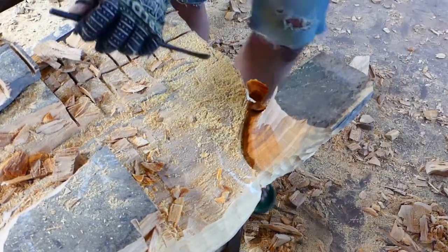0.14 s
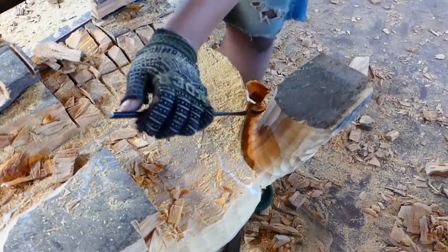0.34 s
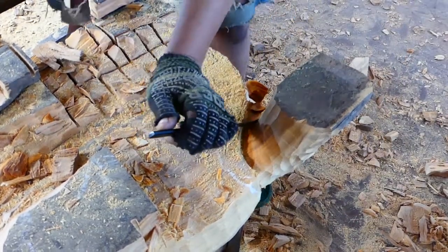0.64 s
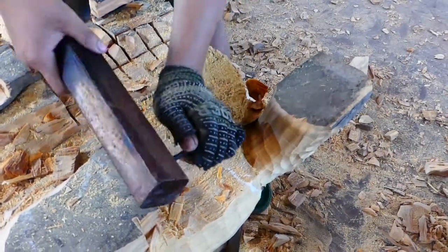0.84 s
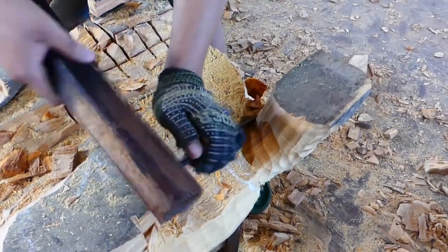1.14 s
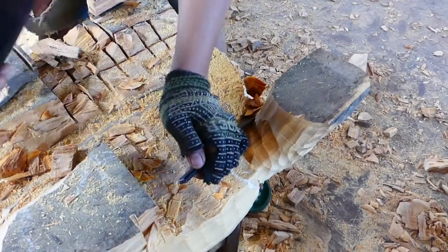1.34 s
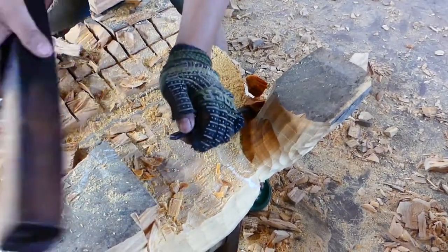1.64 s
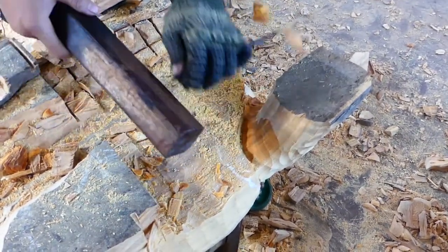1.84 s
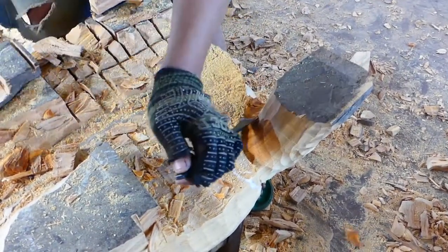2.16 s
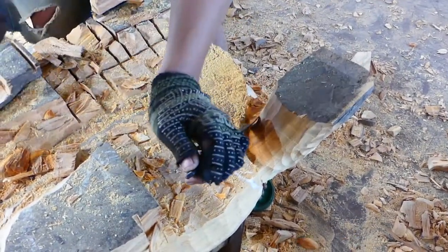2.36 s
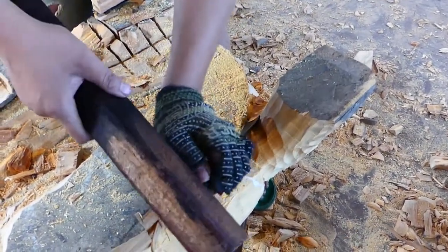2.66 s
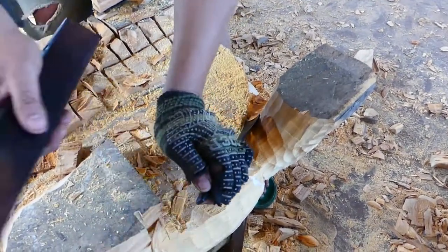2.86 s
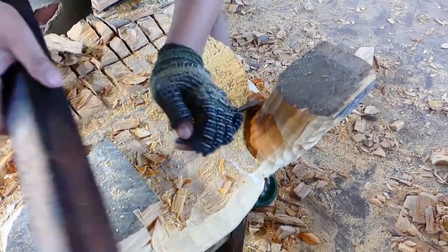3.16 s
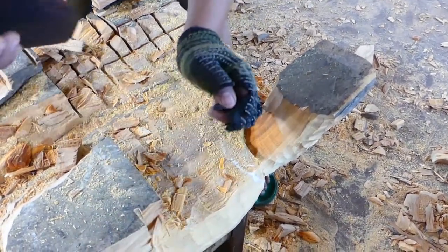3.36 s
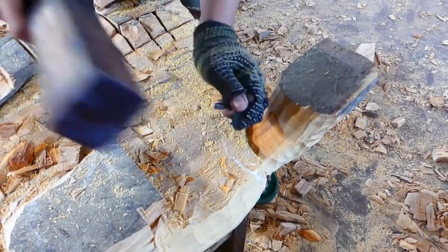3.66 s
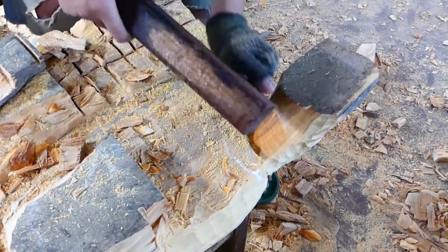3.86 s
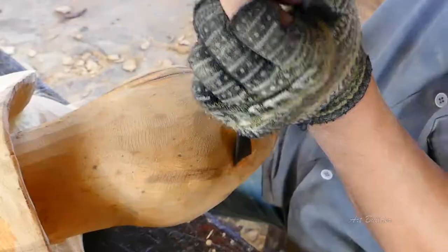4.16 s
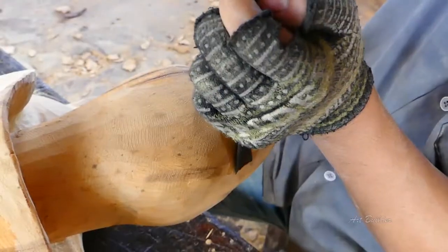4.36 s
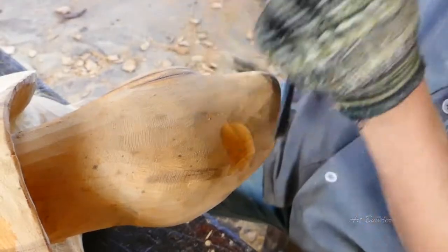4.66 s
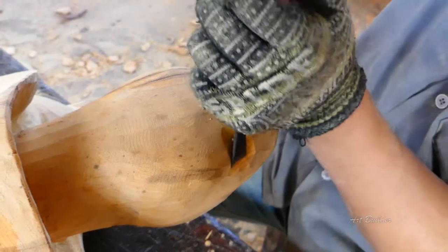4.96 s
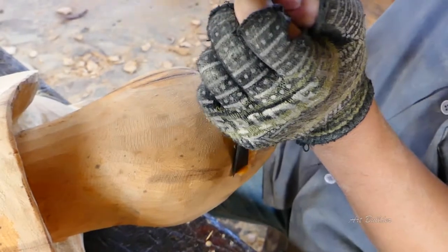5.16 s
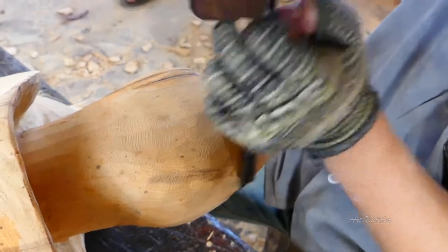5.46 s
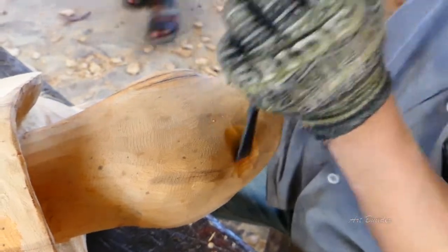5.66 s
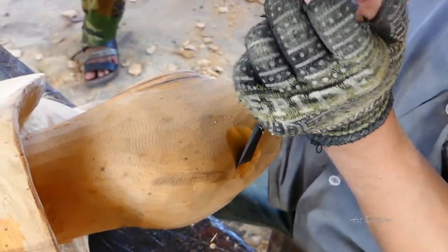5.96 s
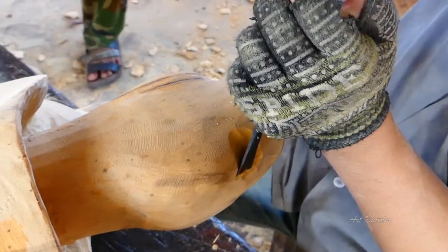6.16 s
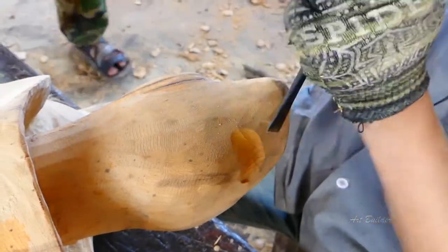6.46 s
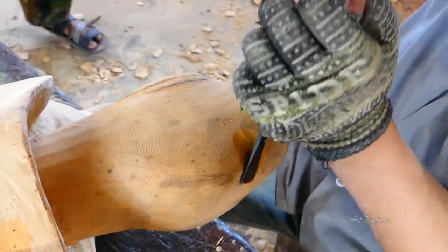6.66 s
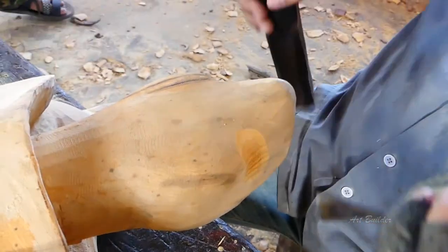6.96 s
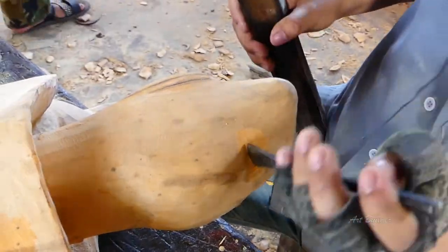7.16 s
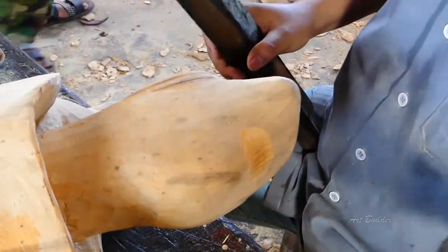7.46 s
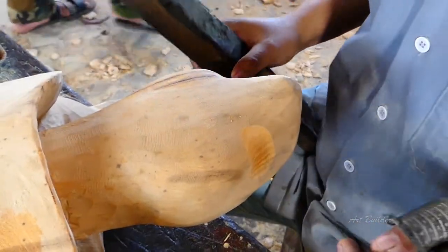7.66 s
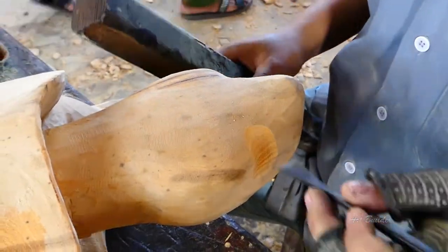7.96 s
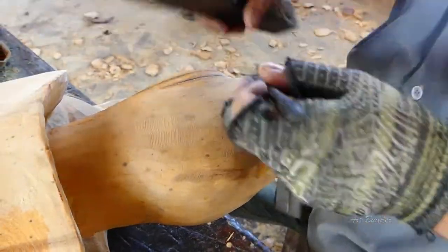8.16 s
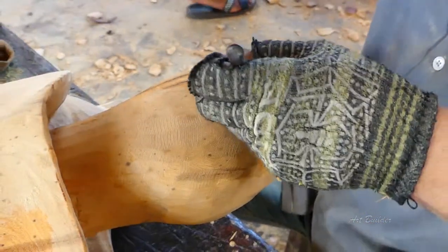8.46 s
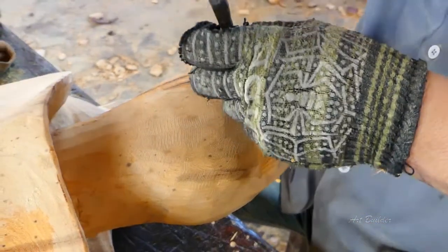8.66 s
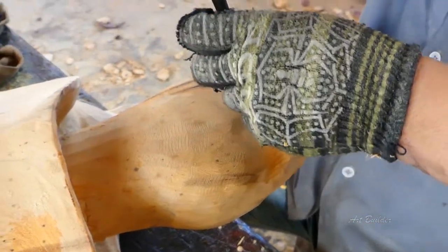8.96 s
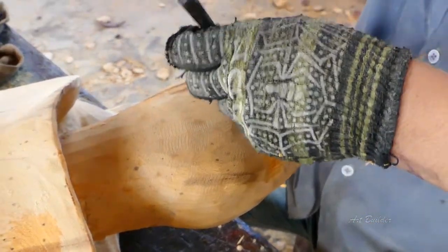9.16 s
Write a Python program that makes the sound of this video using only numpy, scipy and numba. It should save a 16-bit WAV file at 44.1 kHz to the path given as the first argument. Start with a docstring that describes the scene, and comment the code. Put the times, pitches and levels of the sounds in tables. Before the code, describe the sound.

Irregular chisel strikes crack loudly near the microphone in a reverberant, hard-walled workshop. A steady airy grinder hiss with a briefly straining whine fills the first part, with faint distant knocks. A short dead gap ends it abruptly. Then hollow, snapping mallet blows resume over quiet rumble and more distant hammering; the close work stops, small steel tools jingle, and two final hits land before a dull low rush.

```python
"""Wood carving at two benches

A wooden mallet drives a steel chisel close by in a hard-walled workshop; a short silence parts the benches.
Struck parts are decaying sines or resonances fed into lumpy noise tails: the close blows, the knocks of
other carvers and clinking tools. Shaped noise makes the low swells, the distant rumble and, at the first
bench, the grinder's hiss, with sine tones for its whine. A gain control ducks at every close blow."""
import sys
import numpy as np
from scipy import signal
from scipy.fft import rfft, irfft, next_fast_len
from scipy.io import wavfile
from scipy.ndimage import uniform_filter1d, minimum_filter1d, map_coordinates
from numba import njit

SR = 44100
rng = np.random.default_rng(int(sys.argv[2]) if len(sys.argv) > 2 else 0)


def dump(signal):
    """Clip the signal to [-1, 1] and save it as 16-bit WAV at the path in sys.argv[1]."""
    limited = np.clip(np.atleast_2d(signal).T, -1, 1)
    pcm = np.round(limited * 32767).astype(np.int16)
    wavfile.write(sys.argv[1], SR, pcm)


N = 410571

# All source levels are ahead of the gain control.
# Close mallet blows. Each row: start in seconds, peak of the direct blow in dB, pitch of the cut in Hz,
# echo gain in dB, chisel ring in the echo in dB, extra dB there for the ring's modes above UPPER_HZ.
BLOWS = [(0.875, 9, 2660, -7.5, 4, -10), (1.217, 10.5, 3420, -10, 8, -7.5),
         (1.549, 11.5, 3820, -18, 14.5, -5), (1.847, 7, 3606, -8.5, 5, -5.5), (2.683, 6, 4080, -12, 5, -12),
         (3.001, 6.5, 3900, -13.5, 9, -16), (3.558, 10.5, 3700, -5.5, -12.5, -9),
         (3.897, 10, 3730, -12, 3.5, -2), (4.615, 16.5, 3003, 1.5, -4.5, 2),
         (5.156, 10, 4360, -4.5, -5.5, 10), (5.484, 8.5, 2586, -2, -1.5, 3), (6.049, 1.5, 1530, 0, -8, -8),
         (6.385, 9, 2815, -2, -1.5, -5.5), (6.812, 4, 2660, -3, 0, -14),
         (8.763, 12, 2480, -10.5, 1.5, -5.5), (9.105, 9, 1570, -12.5, 3, 0)]
# What mallet and chisel ring with, one list per bench. Each row: pitch in Hz, level in dB, t60 in seconds.
CHISEL_MODES = [
    [(1240, -3, 0.0077), (1827, -8, 0.045), (2810, -22.5, 0.05), (3920, -3, 0.025), (6900, -5, 0.017),
     (8600, -20.5, 0.0074)],
    [(1137, -13.5, 0.056), (1416, 8.5, 0.0063), (2715, 1, 0.031), (3900, -24.5, 0.02), (4550, -0.5, 0.019),
     (6680, -12, 0.016), (12820, -43, 0.0088)],
]
# The block under the chisel, one list per bench. Each row: pitch in Hz, level in dB, t60 in seconds.
BLOCK_MODES = [
    [(480, 3.5, 0.02), (250, -10.5, 0.047)],
    [(464, -1, 0.02), (137, -13, 0.11)],
]
# How hard the block knocks. Each row, one per bench: gain in dB at a 7 dB blow, dB lost per dB of a harder blow.
BLOCK_GAIN = [(-17.5, 1), (-8.5, 0.4)]
# Distant blows, one list per carver. Each row: start in seconds, rms of the first 50 ms in dB, high ring in dB.
FAR_BLOWS = [
    [(2.46, -36, 40), (2.629, -30, 29.5), (3.319, -34.5, 30.5), (7.316, -43.5, 32), (7.515, -39, 24),
     (7.709, -31.5, 21.5), (8.097, -32, 18), (8.277, -31, 19)],
    [(1.468, -30, 7), (2.251, -20, 20), (2.894, -21.5, 18)],
    [(4.562, -23, 13), (6.613, -20, 18.5), (7.939, -21.5, 11)],
    [(4.408, -21.5, 9), (4.764, -13.5, 1), (4.849, -16.5, 4.5), (5.69, -12, 9), (6.371, -26, 11),
     (6.969, -16, 4.5), (7.821, -28, -5)],
    [(1.128, -33.5, -4), (6.19, -31, 15), (6.246, -26.5, 8.5), (7.18, -41, 8.7), (8.129, -19.5, 8),
     (8.294, -23, 7.5), (8.43, -25.5, 17)],
    [(4.797, -14.5, 14), (5.282, -19, 23.5), (5.357, -19.5, 19.5), (5.828, -28, 19)],
]
# The other carvers' tools. Each row: thud in dB, low ring in Hz, low ring in dB, high ring in Hz,
# treble in dB, direct sound in dB.
CARVER_TOOLS = [(-1, 2900, 2.9, 5110, -17.5, -21.5), (-2, 1750, 4.7, 3680, -42, -11),
                (1, 1600, 1.7, 3200, -24, -8), (-4, 2140, 1.2, 2660, -51, -9),
                (5.5, 880, 1.7, 2800, -35.5, -10.5), (-7.5, 1420, 5.4, 3200, -24.5, -2.5)]
# Steel tools knocking together. Each row: start in seconds, gain in dB, cap on the long modes' t60 in seconds,
# t60 of the rattle in seconds.
CLINKS = [(4.855, -24, .06, .2), (6.287, -37, .45, 0.041), (7.73, -34, 0.22, 0.082),
          (7.825, -28, 0.93, 0.42), (8.139, -33.5, 0.31, 0.055), (8.425, -19.5, 0.66, 0.24),
          (8.91, -43, 0.14, .05)]
# What the steel of each clink rings with, one list per clink. Each row: pitch in Hz, level in dB, t60 in seconds.
STEEL_MODES = [
    [(5500, 6, 0.006), (6070, 4, .006), (11050, -16, .05)],
    [(6990, 0, .3), (11580, -1, .4)],
    [(6070, -4, .1), (9050, -4, .2), (10360, -8, .1), (11770, 0, .05), (15200, -6, .3)],
    [(5900, -12, .2), (9060, -5, .4), (10360, -9, .4), (13020, -2, .45), (13310, 0, .5), (15200, -2, .45)],
    [(8480, -6, .3), (12200, -2, .2), (12700, 0, .1)],
    [(3994, -17, .6), (4398, -14, .6), (4936, -13, .5), (6142, -12, .6), (6498, -16, .6), (7919, -16, .6),
     (8425, -12, .5), (10200, -7, .45), (11110, -17, .5), (11720, -16, .6), (12490, -9, .4),
     (13210, -5, .37), (14620, -1, .45), (14730, -9, .45), (15180, -2, .22)],
    [(12780, 0, .07)],
]
# Tick of any steel contact. Each row: pitch in Hz, level in dB, t60 in seconds.
TICK_MODES = [(6000, 5, 0.0013), (8600, -5.5, .003), (12600, -2.5, 0.0036)]
# Grinder levels over time. Each row: time in seconds, hiss in dB, gain on the loaded whine in dB.
GRINDER_LEVELS = [(0, -28.5, -6.5), (.4, -27, -1.5), (.85, -24.5, 5.5), (.92, -25.5, -13),
                  (1.3, -26.5, -35), (2.4, -27.5, -26.5), (4.201, -25, -22)]
# Whine under load. Each row: pitch in Hz, rms in dB before the whine gain above.
LOADED_TONES = [(1739, -45), (2320, -34), (2902, -45), (3483, -41.5), (4064, -50.5), (4640, -47.5),
                (5227, -44.5)]
# Steady lower whine. Each row: pitch in Hz, rms in dB.
IDLE_TONES = [(293, -57.5), (587, -51), (885, -44), (1012, -51), (1174, -45.5), (4107, -66.5)]
# Colour of the grinder's hiss. Each row: frequency in Hz, relative density in dB per Hz.
HISS_COLOUR = [(60, -60), (150, -39.5), (300, -12), (600, -5), (1100, -2), (1900, 1), (5000, 3.5),
               (10600, -3), (11300, -9.5), (12000, -6.5), (15400, -5.5), (16000, -31.5)]
# Low swells. Each row: loudest moment in seconds, level there in dB, centre in Hz, width of the rise in seconds.
SWELLS = [(8.63, -38, 390, 0.033), (9.05, -36.5, 430, 0.083), (9.26, -22, 600, 0.077)]
# Colour of the distant workshop rumble. Each row: frequency in Hz, relative density in dB per Hz.
RUMBLE_COLOUR = [(60, -28), (130, 3.5), (260, 1), (900, 2), (2500, 0), (5000, -4.5), (9000, -17.5),
                 (16000, -18.5)]
# Decay of the room. Each row: frequency in Hz, t60 in seconds.
ROOM_DECAY = [(150, 0.96), (600, 0.72), (2000, 0.76), (5000, 0.81), (12000, 0.22)]
# How much the two ears differ. Each row: frequency in Hz, side over middle in dB.
SIDES = [(60, -20), (150, -12.5), (380, -12.5), (950, -9.5), (2380, -8), (5980, -11.5), (9500, -19.5),
         (15000, -8)]
# The pause between the benches: its start and end in seconds.
SILENCE = (4.205, 4.406)

UPPER_HZ = 3300  # divides the lower and upper chisel modes
CUT_ECHO_DB, ECHO_LUMPS_DB, SPLIT_WIDTH_HZ = -6, 1, 2600
SWELL_FALL_S = 0.29
RUMBLE_DB, SELF_NOISE_DB = -45, -77.5  # rms
TOP_HZ = 16200  # nothing passes above


def amp(db):
    """Gain of a dB value."""
    return 10 ** (np.asarray(db) / 20)


def unit(x):
    """x at rms 1."""
    return x / np.sqrt(np.mean(x ** 2) + 1e-20)


def along(points, hz):
    """Values between (Hz, value) points, on a log frequency axis."""
    f, v = np.transpose(points)
    return np.interp(np.log(hz + 1), np.log(f + 1), v)


def wobble(rate, size):
    """A smooth random curve through `rate` knots a second."""
    knots = rng.standard_normal(int(size * rate / SR) + 4)
    return map_coordinates(knots, [np.arange(size) * rate / SR])


def filtered(x, response):
    """x shaped by a complex response of frequency."""
    m = next_fast_len(x.shape[-1] + 8192)
    spectrum = rfft(x, m) * response(np.fft.rfftfreq(m, 1 / SR))
    return irfft(spectrum, m)[..., :x.shape[-1]]


def peak(f, hz, width_hz):
    """One resonance, gain 1 at its centre."""
    return 1j * f * width_hz / (hz * hz - f * f + 1j * f * width_hz)


def ring(modes, t, scatter_db):
    """Damped modes as exponentially decaying sines, each struck at a new strength."""
    total = 0
    for hz, db, t60 in modes:
        level_db = db + rng.normal(0, scatter_db) - 60 * t / t60
        total = total + amp(level_db) * np.sin(2 * np.pi * hz * t)
    return total


def stereo(pair):
    """Two unrelated signals become the middle and the sides."""
    side = filtered(pair[1], lambda hz: amp(along(SIDES, hz)))
    return pair[0] + np.array([side, -side])


def add(out, s, x):
    """Mix x into out at s seconds; first-bench sounds are cut by the end of the silence."""
    stop = round(SILENCE[1] * SR) if s < SILENCE[0] else N
    part = out[:, round(s * SR):stop][:, :x.shape[1]]
    part += x[:, :part.shape[1]]


def room(x, gap, lumps_db, early_db):
    """Echo of x: a new decaying noise tail after `gap` seconds, lumpiest early, its start weighted by early_db."""
    size = len(x)
    hz, _, z = signal.stft(rng.standard_normal((2, size)), SR, nperseg=256)
    decay = amp(-60 * _ / along(ROOM_DECAY, hz)[:, None])
    tail = signal.istft(z * decay, SR, nperseg=256)[1][:, :size]
    young = np.exp(-np.arange(size) / (0.066 * SR))  # 1 at the start, melting away
    lumps = (young + 1.07) * lumps_db * wobble(300, size)
    tail = stereo(tail) * amp(young * early_db + lumps)
    delayed = np.pad(tail, ((0, 0), (round(gap * SR), 0)))
    delayed = delayed / np.linalg.norm(tail[0])
    return signal.fftconvolve(x[None], delayed, axes=1)[:, :size]


def rush(colour, patchy_db):
    """Coloured stereo noise of rms 1, with patches of random gain over time and frequency."""
    z = signal.stft(rng.standard_normal((2, N)), nperseg=512)[2]
    field = uniform_filter1d(rng.standard_normal(z.shape[1:]), size=6, axis=0)
    field = uniform_filter1d(field, size=12, axis=1)
    pair = signal.istft(z * amp(patchy_db * unit(field)), nperseg=512)[1][:, :N]
    return unit(stereo(filtered(pair, lambda hz: amp(along(colour, hz)))))


def mallet():
    """Close blows: chisel ring, cut, block knock and splitting fibres; the walls answer a little later."""
    out, t = np.zeros((2, N)), np.arange(round(.7 * SR)) / SR
    rise = (1 - np.exp(-t / 0.00067)) ** 2  # softens the onset

    def split(f):
        """Broad resonance of splitting wood over a faint flat floor."""
        return 1.6 * peak(f, 2800, SPLIT_WIDTH_HZ) + 0.032

    for s, db, cut_hz, echo_db, ring_db, upper_db in BLOWS:
        bench = int(s > SILENCE[0])
        block_db, loss = BLOCK_GAIN[bench]
        modes = CHISEL_MODES[bench]
        lower = ring([m for m in modes if m[0] <= UPPER_HZ], t, scatter_db=1.2)
        upper = ring([m for m in modes if m[0] > UPPER_HZ], t, scatter_db=1.2)
        cut = ring([(cut_hz, 3, .012), (cut_hz * .72, -2, .01)], t, scatter_db=1.2)
        block = amp(block_db - loss * (db - 7)) * ring(BLOCK_MODES[bench], t, scatter_db=2)
        fibres = filtered(amp(-60 * t / 0.015) * rng.standard_normal(len(t)), split)
        # the walls hear the splitting as one snap
        snap = amp(16.5) * filtered(signal.unit_impulse(len(t), round(.001 * SR)), split)
        blow = (amp(1.5) * (lower + upper) + cut + block + fibres) * rise
        # the chisel sends its ring unevenly around, so the walls get another balance
        wall_ring = amp(ring_db) * (lower + amp(upper_db) * upper)
        to_walls = (wall_ring + amp(CUT_ECHO_DB) * cut + block + snap) * rise
        echo = room(to_walls, gap=0.012, lumps_db=ECHO_LUMPS_DB, early_db=7.0)
        add(out, s, amp(db) / np.abs(blow).max() * (blow + amp(echo_db) * echo))
    return out


def carvers():
    """Distant blows: impulses through a thud, a woody body and two rings, dulled by distance, with their echo."""
    out = np.zeros((2, N))
    for tool, blows in zip(CARVER_TOOLS, FAR_BLOWS):
        thud_db, low_hz, low_db, high_hz, treble_db, direct_db = tool
        for s, db, high_db in blows:
            def colour(f):
                """Resonances of tool and wood, plus treble that skips the dulling."""
                rings = amp(low_db) * peak(f, low_hz, 150) - amp(high_db) * peak(f, high_hz, 160)
                wood = amp(thud_db) * peak(f, 267, 460) - peak(f, 2100, 5500) - rings
                return wood / (1 + 1j * f / 5200) ** 4 + amp(treble_db) * peak(f, 4700, 9200)

            knock = filtered(signal.unit_impulse(round(.8 * SR)), colour)
            # the stronger the direct sound, the stronger the early echoes
            echo = room(knock, gap=0.0012, lumps_db=1.0, early_db=0.53 * (direct_db + 18))
            heard = amp(direct_db) * knock + echo
            add(out, s, amp(db) * heard / np.std(heard[:, :SR // 20]))
    return out


def clinks():
    """Solid steel rings high: long modes swell and shimmer, short ones tick again at every small bounce."""
    out, t = np.zeros((2, N)), np.arange(round(.8 * SR)) / SR
    for (s, db, longest, rattle), modes in zip(CLINKS, STEEL_MODES):
        sounding = np.zeros(len(t))
        for hz, level, t60 in modes:
            if t60 > .08:
                shimmer = amp(5 * wobble(80, len(t)))
                sounding += shimmer * ring([(hz, level, min(t60, longest))], t, scatter_db=1.5)
        short_modes = [mode for mode in modes if mode[2] <= .08]
        tick = ring(short_modes + TICK_MODES, t, scatter_db=1)
        struck = rng.random(len(t)) < 700 / SR  # about 700 bounces a second
        bounces = struck * amp(-60 * t / rattle) * rng.standard_normal(len(t))
        bounces[0] = 1
        ticks = signal.fftconvolve(tick, bounces)[:len(t)]
        swell = 1 - np.exp(-t / 0.013)
        steel = amp(db) * (sounding * swell + 1.5 * ticks)
        echo = room(steel, gap=.008, lumps_db=4, early_db=.8)
        add(out, s, steel * amp([[.8], [-.8]]) + amp(-5) * echo)  # direct sound leans left
    return out


def grinder():
    """Hiss of the disc and cooling air, a whine that swells under load and a steady lower one."""
    t = np.arange(N) / SR
    s, hiss_points, loaded_points = np.transpose(GRINDER_LEVELS)
    hiss_db = np.interp(t, s, hiss_points)
    loaded_db = np.interp(t, s, loaded_points)
    hiss = amp(hiss_db + .4 * wobble(9, N)) * rush(HISS_COLOUR, patchy_db=.6)
    motor = amp(loaded_db) * whine(LOADED_TONES, t) + whine(IDLE_TONES, t)
    return (hiss + motor) * (t < SILENCE[1]) * amp([[.4], [-.4]])  # leans slightly left


def whine(tones, t):
    """Slightly unsteady motor tones: sines sharing one pitch drift, each with its own level wobble."""
    drift = np.cumsum(wobble(6.44, N)) / SR
    total = np.zeros(N)
    for hz, db in tones:
        level = np.sqrt(2) * amp(db + 1.3 * wobble(14, N))
        total += level * np.sin(2 * np.pi * hz * (t + .0008 * drift))
    return total


def swells():
    """Soft swells, perhaps wood dragged over the floor: noise in a broad low resonance and a fainter higher one."""
    out, t = np.zeros((2, N)), np.arange(N) / SR
    for s, db, hz, rise in SWELLS:
        width = np.where(t < s, rise, SWELL_FALL_S)
        shape = np.exp(-.5 * ((t - s) / width) ** 2) * amp(2.2 * wobble(40, N))
        noise = filtered(rng.standard_normal((2, N)),
                         lambda f: peak(f, hz, 1.27 * hz) ** 2 + 0.075 * peak(f, 1700, 1640))
        out += amp(db) * shape * unit(stereo(noise))
    return out


def rumble():
    """Distant workshop rumble: patchy coloured noise at a nearly steady level."""
    return amp(RUMBLE_DB + 0.22 * wobble(6.3, N)) * rush(RUMBLE_COLOUR, patchy_db=3)


def scene():
    """Both benches, with the silence between them."""
    t = np.arange(N) / SR
    sound = (t < SILENCE[0]) | (t > SILENCE[1])
    gate = uniform_filter1d(sound * 1., size=90)  # 2 ms fades
    return (mallet() + carvers() + clinks() + grinder() + swells() + rumble()) * gate


@njit
def follow(need, attack, release):
    """Moves quickly down to the needed gain and slowly back up."""
    out, now = np.empty_like(need), 0.
    for i in range(len(need)):
        now += (need[i] - now) * (attack if need[i] < now else release)
        out[i] = now
    return out


def record(dry):
    """Fast gain control, soft limiting of what escapes, bass cut, low self-noise, hard clipping and band limit."""
    over_db = np.minimum(0, -6 - 20 * np.log10(np.abs(dry).max(0) + 1e-9))  # gain that holds peaks to -6 dB
    hold = round(0.014 * SR)
    need_db = minimum_filter1d(over_db, size=hold, origin=(hold - 1) // 2)  # the gain stays down for a moment
    attack, release = 1 / (0.00086 * SR), 1 / (.11 * SR)  # 0.86 ms and 110 ms
    x = dry * amp(follow(need_db, attack, release))
    x = x / (1 + np.abs(x / 0.95) ** 6) ** (1 / 6)
    x = filtered(x, lambda hz: (1j * hz / (95 + 1j * hz)) ** 6)
    self_noise = unit(filtered(rng.standard_normal(x.shape), lambda hz: hz < 90))
    x = x + amp(SELF_NOISE_DB) * self_noise * (np.abs(dry) > 0)  # none where the scene is exactly zero
    return filtered(np.clip(x, -.97, .97), lambda hz: hz < TOP_HZ)


dry = scene()
out = record(dry)
dump(out)
```